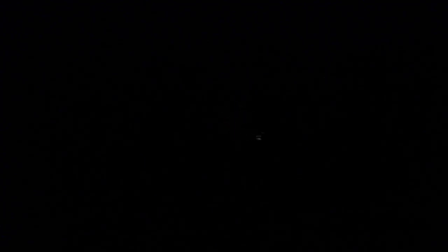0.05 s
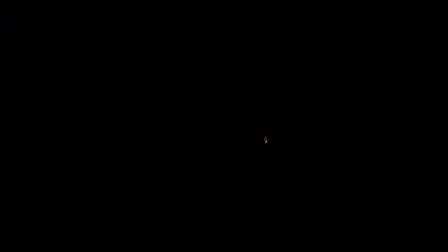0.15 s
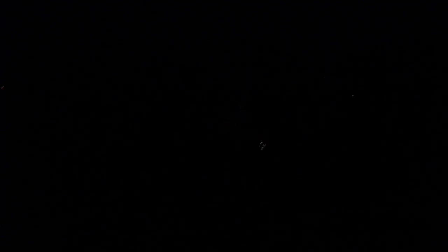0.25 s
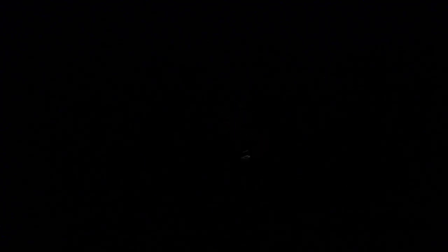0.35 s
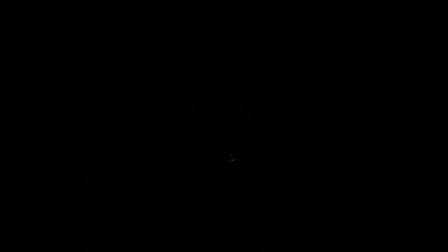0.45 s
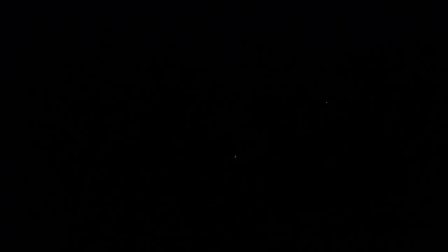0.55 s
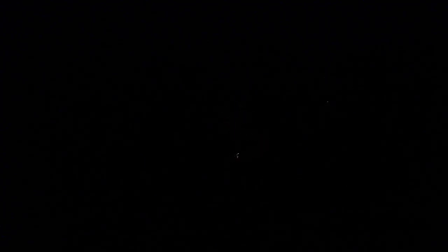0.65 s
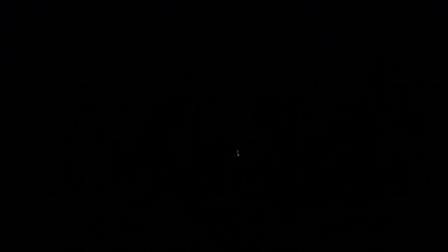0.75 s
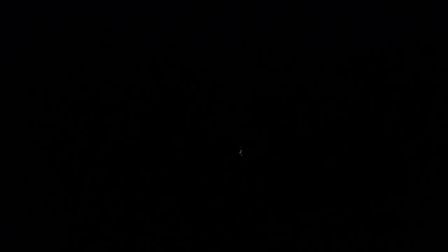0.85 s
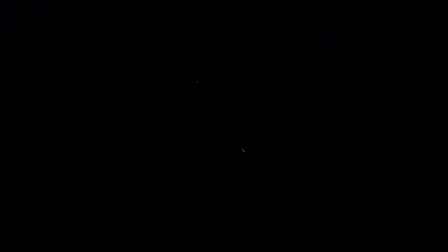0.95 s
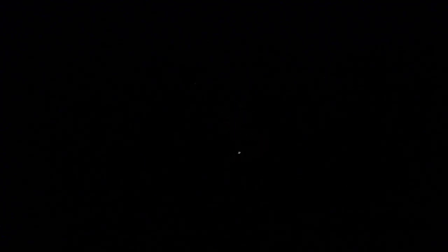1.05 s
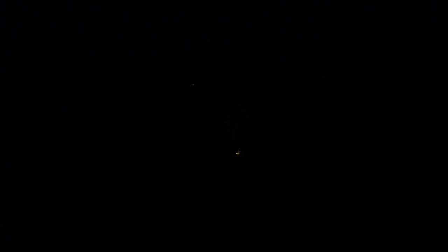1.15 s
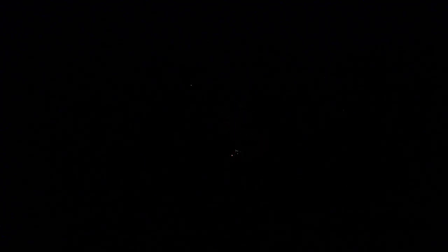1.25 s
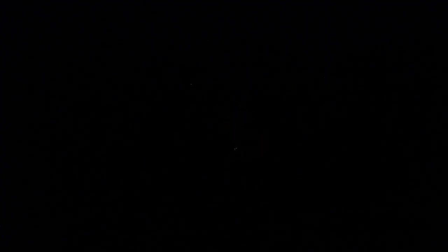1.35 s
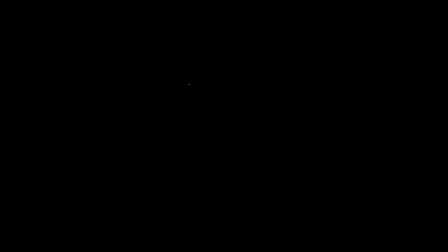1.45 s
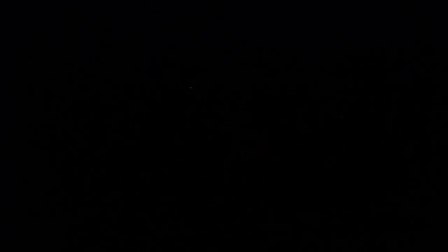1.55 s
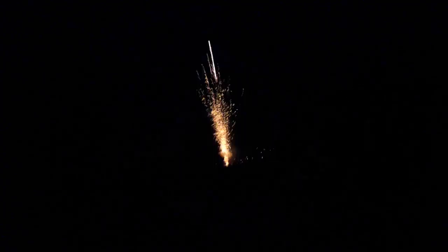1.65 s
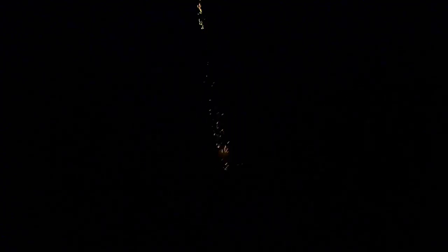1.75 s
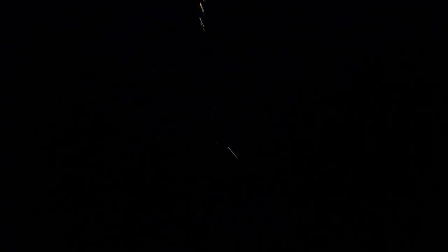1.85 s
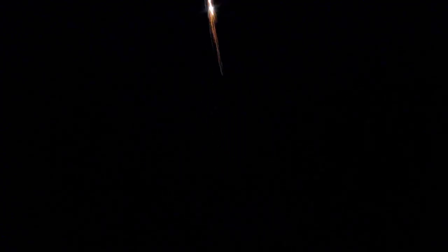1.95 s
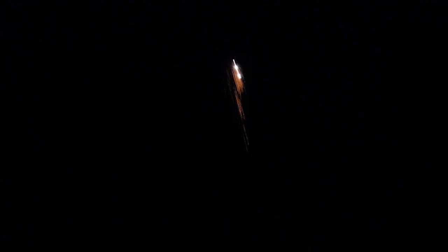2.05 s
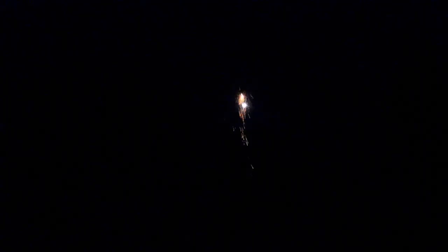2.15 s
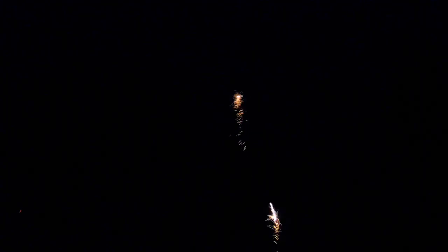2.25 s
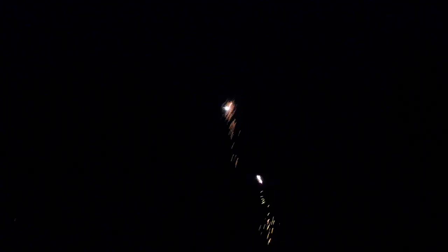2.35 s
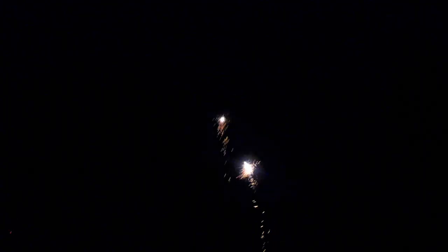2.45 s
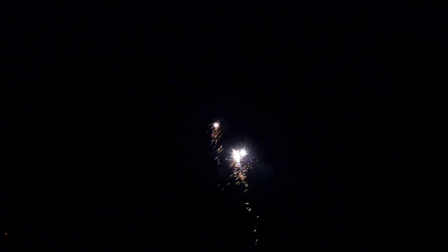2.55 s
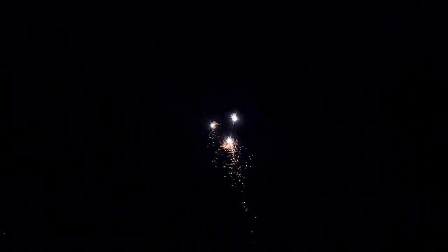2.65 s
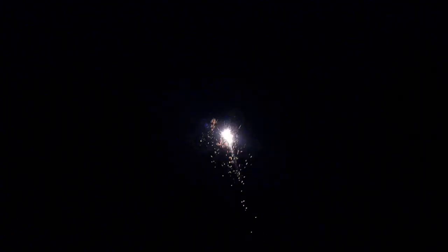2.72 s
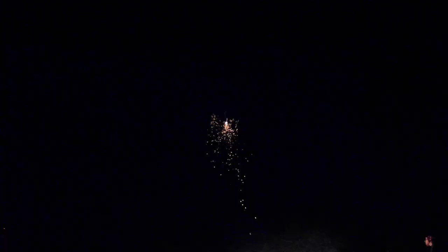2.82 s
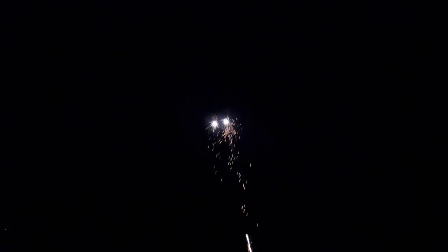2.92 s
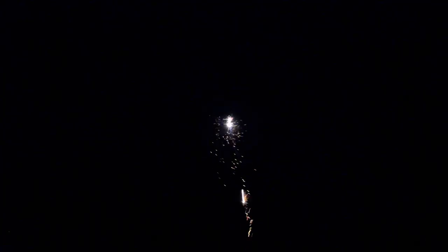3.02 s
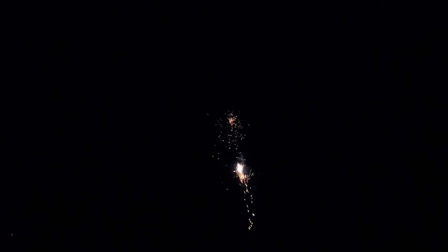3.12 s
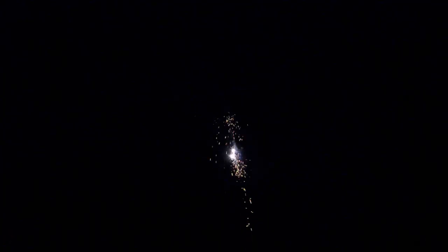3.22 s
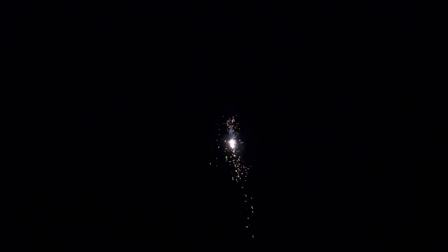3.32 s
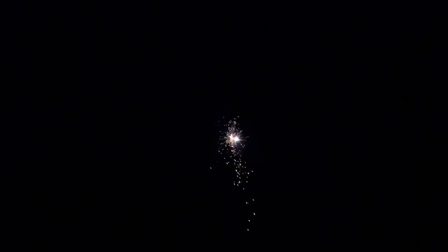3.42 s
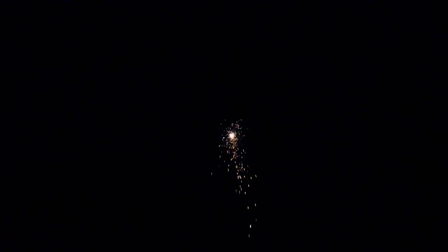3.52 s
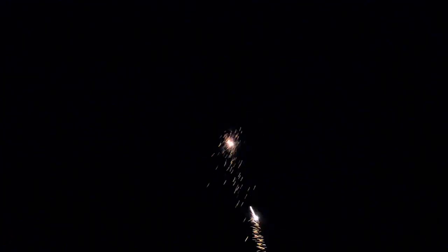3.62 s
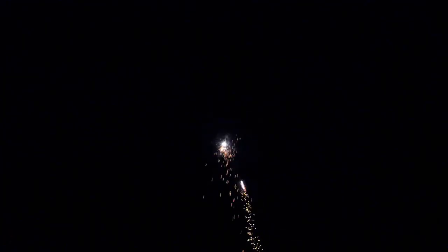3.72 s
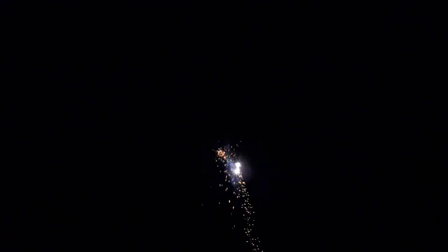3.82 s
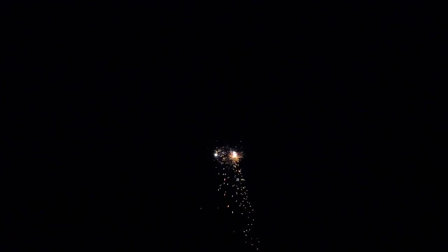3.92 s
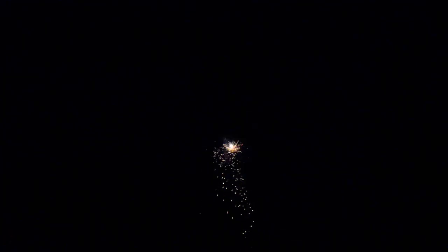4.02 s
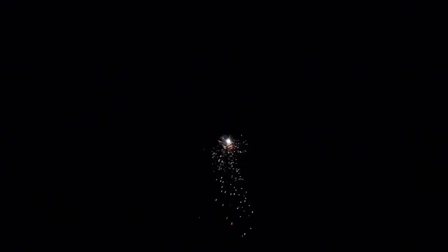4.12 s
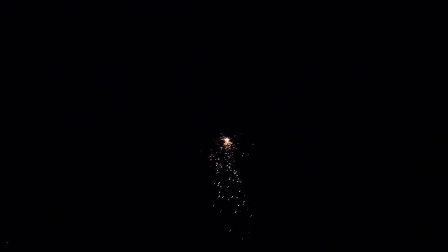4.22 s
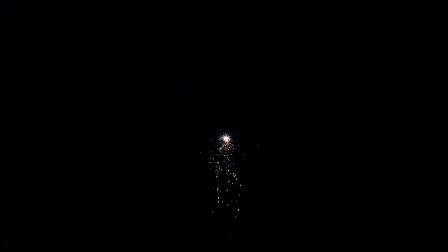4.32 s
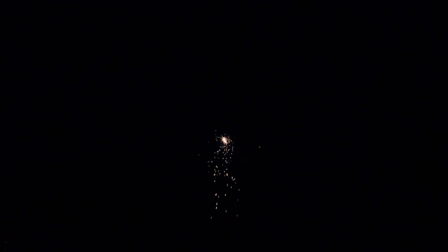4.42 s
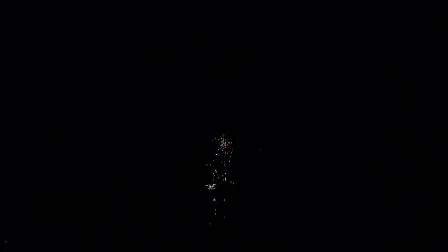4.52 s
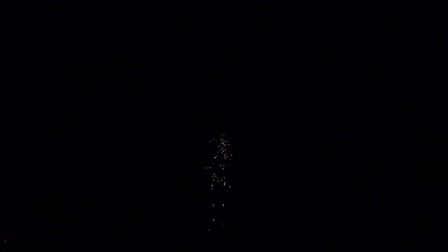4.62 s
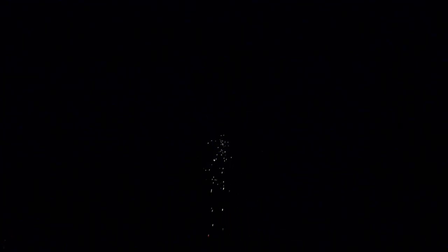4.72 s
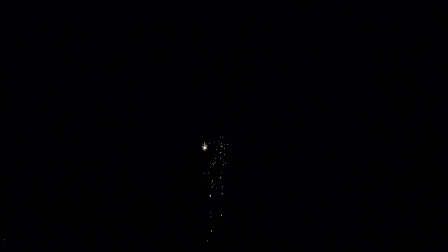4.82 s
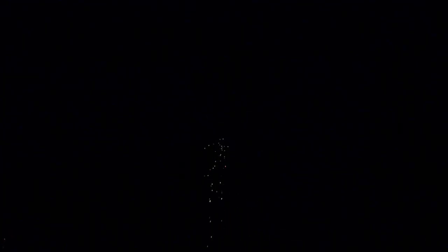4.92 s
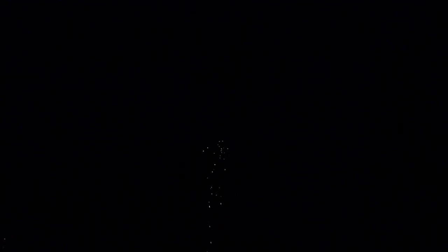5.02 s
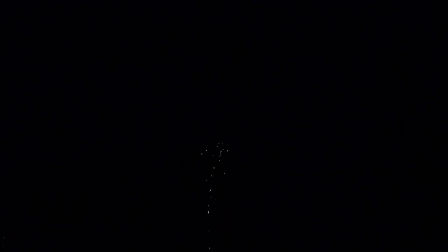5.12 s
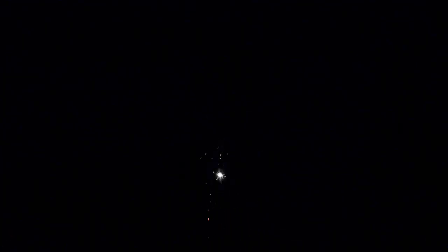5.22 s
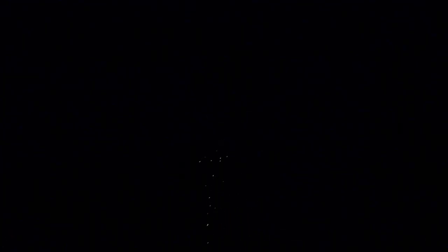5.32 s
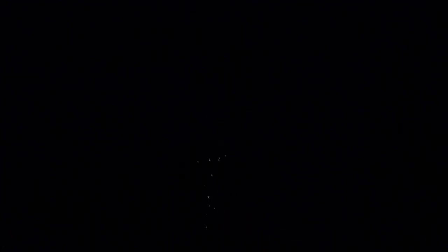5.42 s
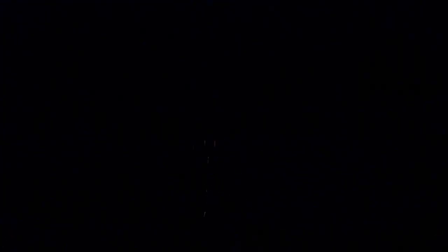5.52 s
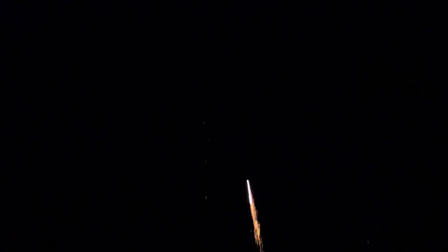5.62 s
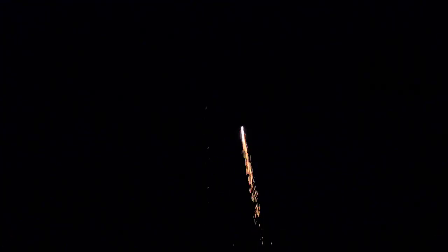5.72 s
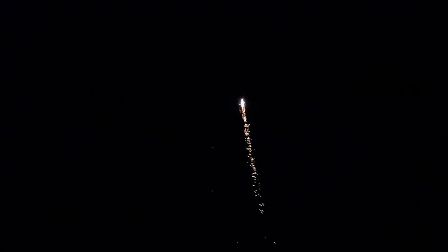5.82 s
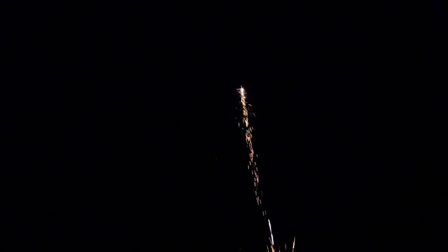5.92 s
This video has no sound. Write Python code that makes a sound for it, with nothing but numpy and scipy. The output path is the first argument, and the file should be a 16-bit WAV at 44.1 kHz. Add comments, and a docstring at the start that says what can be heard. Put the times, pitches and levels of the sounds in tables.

```python
"""Outdoors at night, close to small fireworks. Over soft air, wind and a drone come distant pops and fizz.
Six shots thump out of their tubes, each a crack, a push of gas and a short note. Each sends up a star,
a burning pellet whose grains burst in sharp cracks that bounce off the ground while tiny sparks sputter.
Shots and cracks echo from the surroundings, and the loud ones overload the microphone."""
import sys
import numpy as np
from scipy import signal
from scipy.fft import rfft, irfft, next_fast_len
from scipy.io import wavfile

SR = 44100
rng = np.random.default_rng(int(sys.argv[2]) if len(sys.argv) > 2 else 0)


def digitize_waveform(pressure):
    """Quantize a signal to 16-bit integers and store it at the path in sys.argv[1].

    Rows of a 2-D input are taken as channels; values are limited to [-1, 1].
    """
    field = np.atleast_2d(pressure).T
    bounded = np.clip(field, -1, 1)
    quanta = np.round(bounded * 32767).astype(np.int16)
    wavfile.write(sys.argv[1], SR, quanta)


N = 262836

# The colour (low and high balance) of night air. Each row: frequency in Hz, relative level in dB.
AIR_COLOUR = [(12, -34), (20, -11), (91, -9), (158, -13.5), (182, -17), (293, -16.5), (388, -18.5),
              (499, -17), (678, -20), (780, -19), (849, -21.5), (1440, -22.5), (3740, -35.5),
              (12400, -39.5), (16000, -41)]
# Wind moving over the microphone. Each row: time in seconds, level in dB.
WIND_LEVEL = [(0, -81), (1.5, -46.5), (1.8, -51), (1.9, -38), (2.02, -41), (2.2, -53), (3.4, -76),
              (4.5, -60), (5.96, -51)]
# A faint, far-off drone. Each row: time in seconds, level in dB.
DRONE_LEVEL = [(0, -58), (.3, -56), (.45, -51), (.85, -54), (1.1, -58.5), (1.45, -58), (5.96, -59)]
# Distant fireworks. Each row: start in seconds, level in dB before dulling.
DISTANT_POPS = [(.030, -33.5), (.060, -36.5), (0.217, -36), (1.054, -30)]
# The colour of one crack. Each row: frequency in Hz, relative level in dB.
PULSE_COLOUR = [(40, -18), (200, -11), (600, -4.5), (1200, 2.5), (1750, 3.5), (2750, -9.5), (3550, -5),
                (4400, -27), (5200, -17), (6700, -28.5), (7800, -37), (9400, -28.5), (11400, -35.5),
                (13300, -40)]
# Shots from the tubes. Each row: start in seconds, crack in dB, gas push in dB, push length in
# milliseconds, gas jet in dB, tube note in Hz, note in dB, seconds for the note to fade by 60 dB,
# feed to the echoes in dB.
TUBE_SHOTS = [(1.5360, 11.5, 11.5, 1.4, 5.5, 156.6, 12, 0.025, 1),
              (2.0406, 15.5, 5.5, 0.76, -6, 215, -19, 0.037, -4.5),
              (2.7567, 14, 10, 0.76, -8, 156, -10, 0.072, -8),
              (3.3956, -0.5, 9.5, 0.93, -4, 179.7, -12, 0.082, -8.5),
              (5.4018, 9, 2, 0.82, -10, 192, -18, 0.083, -5),
              (5.7966, 5, 2, 0.93, -7, 251, -8, 0.037, -4.5)]
# The colour of gas rushing out of a tube. Each row: frequency in Hz, relative level in dB.
GAS_JET_COLOUR = [(60, 4), (250, 7.5), (480, 1.5), (800, 4), (1700, 4.5), (2600, -1), (5000, -22),
                  (9000, -27), (15000, -27)]
# How the echoes of shots and of cracks die away. Each row: delay in seconds, relative level in dB.
SHOT_ECHO_SHAPE = [(0, 14), (.02, -14.5), (.04, -10.5), (.066, -6), (0.081, 0.5), (.1, -0.5), (.12, -5),
                   (.2, -12.5), (.32, -20), (0.998, -63)]
CRACK_ECHO_SHAPE = [(0, 12), (0.021, 0.5), (.045, 1), (0.069, 4.5), (.1, -0.5), (0.161, -8), (.3, -16.5),
                    (0.599, -12.5), (1.002, -57)]
# The colour of those echoes. Each row: frequency in Hz, boost or cut in dB.
SHOT_ECHO_TONE = [(30, -25), (85, -8), (130, -4), (180, 1.5), (300, -2.5), (600, 2.5), (1500, -1),
                  (2700, 15), (4500, -0.5), (9000, -8), (15000, -11)]
CRACK_ECHO_TONE = [(60, -50), (160, 2), (350, -3), (800, -1), (1600, -1), (3500, 0), (5200, 5), (9500, 3),
                   (15000, 3)]
# The cracks that stand out. Each row: start in seconds, peak in dB, base treble tilt in dB per octave.
MAIN_CRACKS = [(1.741, -11.5, 3), (1.7506, -8.5, 5.5), (1.8528, -16.5, 1.5), (1.882, -9.5, -2),
               (1.9104, 4.5, 8), (1.948, -3.5, 6.5), (1.9577, -6, 7), (2.026, -1.5, -8), (2.0608, 3, 1.5),
               (2.0659, 2.5, -5), (2.097, 0.5, 6.5), (2.1458, 4.5, 3), (2.1713, 3.5, 1), (2.1769, -1, 1),
               (2.1977, 0.5, 3), (2.3443, -1.5, 3.5), (2.3646, -5, 4), (2.3782, 6.5, 1), (2.4075, 4.5, 4),
               (2.4095, 4, 9), (2.4409, 7.5, 5), (2.4521, 8.5, 1.5), (2.4696, 9.5, 4.5), (2.4723, 11, 0),
               (2.507, 10, 5), (2.517, 10.5, 2.5), (2.5555, 6, 1), (2.563, 10.5, 2), (2.5881, -0.5, -3),
               (2.6011, 0.5, 3), (2.6099, 4, 6), (2.6247, 8, 2), (2.6596, 11.5, -4), (2.6666, 6.5, 10),
               (2.6826, -3, -9), (2.6899, 9.5, -1), (2.6937, 11.5, 4), (2.721, -3.5, 8), (2.8219, 2, 1),
               (2.8411, 4, 2), (2.851, 7.5, 4), (2.862, -0.5, 6), (2.883, 1.5, 2), (2.8984, -3.5, -1),
               (2.909, 6, 1), (2.934, 3.5, 2), (2.9485, -1, 2), (2.9946, 8, 2.5), (3.0252, 0, 2),
               (3.0368, 7.5, 4.5), (3.0817, .5, 1), (3.0998, -3, 13), (3.1079, -1, -1), (3.1127, 3, 4.5),
               (3.129, 0, 2), (3.1564, 5, 5), (3.1943, 5.5, 2.5), (3.2123, 2.5, 2), (3.2516, 1, 4.5),
               (3.2765, 0, -1), (3.2871, -0.5, 1), (3.2976, 3, 1), (3.324, 2.5, -7), (3.3478, 4, -0.5),
               (3.3684, 7, 5), (3.3877, 4, .5), (3.467, 9, 3), (3.5132, -4, -9), (3.5326, 6, 3),
               (3.5752, -.5, 7), (3.6093, 2, 4), (3.633, -1, 0), (3.6376, 3.5, 1.5), (3.6562, 0, 3),
               (3.6696, 5.5, 2), (3.7027, 7.5, 4.5), (3.7792, 2, 1.5), (3.7919, 7.5, 4.5), (3.8136, 2.5, 4),
               (3.8469, 2, -1), (3.868, 6.5, 8), (3.929, 3.5, -2.5), (3.9421, 2, -1), (3.9488, 4, 4),
               (3.9695, -3, 5.5), (3.9977, -4.5, -1), (4.0204, 8, 3), (4.1145, 1.5, -2), (4.12, -2.5, -1),
               (4.1507, 2.5, 2), (4.1824, 2.5, 1), (4.244, -5.5, -0.5), (4.2627, -6.5, 4), (4.285, 0, 4.5),
               (4.32, -1, 3.5), (4.3917, 1, 0.5), (4.4356, -5, 1.5), (4.4828, 12, -.5), (4.6635, 2.5, 1.5),
               (4.7967, 9.5, 1), (5.2098, -5, -1), (5.5182, -16.5, 3.5), (5.7245, -20.5, 0),
               (5.7615, -21, 2), (5.787, -20, 2), (5.8135, -1.5, 5), (5.8216, 1, 3), (5.8583, 2, 5.5),
               (5.9253, -7.5, -1.5)]
# The microphone's uneven response. Each row: frequency in Hz, boost or cut in dB.
MIC_COLOUR = [(600, 0.5), (900, -1), (1300, 0.45), (2000, 0), (4100, 0), (5100, -0.06), (6800, -0.5),
              (7700, -3), (8450, -2), (9000, 1.5), (9900, -1.3), (11500, -2.9), (12400, 1), (13050, -1.5),
              (13700, 1.5), (16000, -6)]

# A star's life, in seconds after its shot: it catches, then burns fiercely for a while.
FUSE_S, FIERCE_START_S, FIERCE_END_S = .31, .41, .98


def gain_of(db):
    """Turns decibels into a number to multiply a sound by."""
    return 10 ** (np.asarray(db) / 20)


def evened(x):
    """Scales a sound to an average (rms) level of one."""
    return x / np.sqrt(np.mean(x ** 2) + 1e-20)


def colour_db(colour, hz):
    """Looks up a colour table, sliding between its rows on a scale of pitch."""
    row_hz, row_db = np.transpose(colour)
    return np.interp(np.log(hz + 1), np.log(row_hz + 1), row_db)


def level(curve):
    """Turns a table of times and decibels into a gain for every sample."""
    return gain_of(np.interp(np.arange(N) / SR, *np.transpose(curve)))


def add(mix, start_s, sound):
    """Mixes a sound in at its start time."""
    part = mix[max(round(start_s * SR), 0):][:len(sound)]
    part += sound[:len(part)]


def coloured(x, colour):
    """Boosts or cuts each frequency as a colour table says."""
    size = next_fast_len(len(x) + 4096)
    gains = gain_of(colour_db(colour, np.fft.rfftfreq(size, 1 / SR)))
    return irfft(rfft(x, size) * gains, size)[:len(x)]


def band(x, hz, kind, order=2):
    """Keeps the "low" or the "high" side of a frequency."""
    return signal.sosfilt(signal.butter(order, hz, kind, fs=SR, output="sos"), x)


def through(x, response):
    """Lets every sample set off a copy of the response, up to the end of the scene."""
    return signal.oaconvolve(x, response)[:N]


def crack_pulse(tilt_db=0., size=1024):
    """One sharp pulse of pressure with a peak of one; more tilt makes it brighter."""
    hz = abs(np.fft.fftfreq(size, 1 / SR))
    log_gain = np.log(gain_of(colour_db(PULSE_COLOUR, hz) + tilt_db * np.log2(1 + hz / 2500)))
    spectrum = np.exp(np.conj(signal.hilbert(log_gain)))  # packs the energy at the very start
    pulse = np.fft.ifft(spectrum).real[:size // 2]
    return -pulse / abs(pulse).max()


def scattered(x, fade_s, size=4096):
    """Nearby things throw a sound back as a short spray that drops 60 dB in fade_s."""
    t = np.arange(size) / SR
    spray = rng.standard_normal(size) * gain_of(-60 * t / fade_s) * (1 - np.exp(-t / .00063))
    return signal.fftconvolve(x, spray / np.linalg.norm(spray))


def night(air_db=-50):
    """Steady night air, a low, lumpy wind and a far-off drone, all shaped from noise."""
    air, wind, drone = rng.standard_normal((3, N))
    air = gain_of(air_db) * evened(coloured(air, AIR_COLOUR))
    wind = level(WIND_LEVEL) * evened(band(band(wind, 55, "low"), 14, "high"))
    drone = level(DRONE_LEVEL) * evened(band(band(drone, 160, "low", order=4), 85, "high", order=4))
    return air + wind + drone


def far_pops(smear_db=2, dull_hz=2200):
    """Distant fireworks arrive dull and smeared."""
    out = np.zeros(N)
    pulse = band(crack_pulse(), dull_hz, "low")
    for start, db in DISTANT_POPS:
        add(out, start, gain_of(db) * pulse)
        add(out, start, gain_of(db + smear_db) * scattered(pulse, fade_s=.043))
    return out


def far_fizz(peak_s=.86, width_s=.16, db=-57.5, dull_hz=2000):
    """The crackle of a distant firework blurs into one soft swell."""
    swell = np.exp(-((np.arange(N) / SR - peak_s) / width_s) ** 2)
    fizz = through(rng.standard_normal(N), crack_pulse())
    return gain_of(db) * swell * evened(band(fizz, dull_hz, "low"))


def shots(overtone_db=-13, jet_fade_s=.025, roar_db=-14, roar_fade_s=.15, near_db=-17,
          boom_db=-2, front_db=10):
    """Gas bursts out of each tube and makes it ring. Returns the sound and what feeds its echoes."""
    out, echo_feed = np.zeros((2, N))
    t = np.arange(SR // 4) / SR
    for start, crack_db, push_db, push_ms, jet_db, hz, note_db, note_fade_s, feed_db in TUBE_SHOTS:
        progress = t / (push_ms / 1000)
        push = -gain_of(push_db) * (1 - progress) * np.exp(-progress)
        pulse = np.pad(crack_pulse(), (0, len(t)))[:len(t)]
        crack = gain_of(crack_db) * band(pulse, 2100, "low", order=3)
        jet = gain_of(jet_db) * evened(coloured(rng.standard_normal(len(t)), GAS_JET_COLOUR))
        # a tube closed at one end rings at 1, 3 and 5 times its lowest frequency
        ring = sum(gain_of(k * overtone_db) * np.sin(2 * np.pi * (2 * k + 1) * hz * t) for k in range(3))
        note = -gain_of(note_db - 60 * t / note_fade_s) * ring
        hiss = gain_of(-60 * t / jet_fade_s) * jet
        roar = gain_of(roar_db - 60 * t / roar_fade_s) * band(jet, 650, "low")  # big swirls last longer
        nearby = gain_of(near_db) * scattered(push + crack, fade_s=.086)[:len(t)]
        shot = band(push, 1500, "low") + crack + note + hiss + roar + nearby
        add(out, start, band(shot, 60, "high", order=1))  # a small opening gives little deep bass
        blast = push + crack + gain_of(boom_db) * note  # these parts carry far
        blast[0] += gain_of(jet_db + front_db)  # a fierce jet sends a brighter shock front
        add(echo_feed, start, gain_of(feed_db) * blast)
    return out, echo_feed


def echoes(x, shape, colour, per_s=8000, patchy_db=3.5, air_loss_db=1.5, paths=3):
    """The surroundings answer; air dulls the late echoes, and the paths change as the stars move."""
    t, out = np.arange(SR) / SR, np.zeros(N)
    for k in range(paths):
        bounces = rng.standard_normal(SR) * (rng.random(SR) < per_s / SR)
        wobble = evened(band(rng.standard_normal(SR), 57, "low"))
        bounces *= gain_of(np.interp(t, *np.transpose(shape)) + patchy_db * wobble)
        hz, delay, spectra = signal.stft(bounces / np.linalg.norm(bounces), SR, nperseg=256)
        loss_db = air_loss_db * np.outer(hz / 1000, delay)  # grows with each kHz and each second
        tail = signal.istft(spectra * gain_of(-loss_db), SR, nperseg=256)[1]
        # the paths take turns fading in and out
        share = np.sqrt(2 / paths) * np.cos(np.pi * (3 * np.arange(N) / SR + k / paths))
        out += through(x * share, tail)
    return coloured(out, colour)


def star_age(now):
    """Seconds since the shot of the newest star to have caught, or FUSE_S if none has yet."""
    return min((now - shot[0] for shot in TUBE_SHOTS if now - shot[0] > FUSE_S), default=FUSE_S)


def cracks(steepen=.02, climb_s=.2168, top_lag_s=.0068, near_db=-16, ground_db=-8.5, grass_db=-16,
           wall_s=.0333, wall_db=-28):
    """Each grain bursts once; nearby things, the grassy ground and a wall throw the pulse back."""
    out = np.zeros(N)
    for start, db, tilt_db in MAIN_CRACKS + chained_cracks():
        pulse = gain_of(db) * crack_pulse(tilt_db + steepen * db)  # stronger bursts are sharper
        near_spray = crack_pulse(tilt_db / 2 + 6)
        grass_spray = crack_pulse(tilt_db / 2 + 4)
        # a star slows as it climbs; the higher it is, the later the ground bounce
        height = 1 - np.exp(-star_age(start) / climb_s)
        lag = top_lag_s * height * (1 + .03 * rng.standard_normal())
        add(out, start, pulse)
        add(out, start, gain_of(db + near_db) * scattered(near_spray, fade_s=.0092))
        add(out, start + lag, gain_of(ground_db) * band(pulse, 3400, "low", order=1))
        add(out, start + lag, gain_of(db + grass_db) * scattered(grass_spray, fade_s=.021))
        add(out, start + wall_s, gain_of(wall_db) * pulse)
    return out


def chained_cracks(share=.6, soonest_s=.002, wait_s=.007, weaker_db=-11, spread_db=2.5, tilt_db=3.5):
    """While a star burns fiercely, a grain may set off a weaker neighbour. Returns extra crack rows."""
    chance, wait = rng.random((len(MAIN_CRACKS), 2)).T
    size, brightness = rng.standard_normal((len(MAIN_CRACKS), 2)).T
    rows = []
    for k, (start, db, _) in enumerate(MAIN_CRACKS):
        if chance[k] < share and FIERCE_START_S < star_age(start) < FIERCE_END_S:
            later = start + soonest_s - wait_s * np.log(1 - wait[k])
            rows.append((later, db + weaker_db + spread_db * size[k], tilt_db * brightness[k]))
    return rows


def sputter(db=-39, per_s=900, spread_db=4, start_s=.43, rise_s=.12, end_s=1.73, fade_s=.44,
            flare_db=4.5, flare_s=.18):
    """Countless tiny sparks, a few of them larger; each star's share flares up, holds and fades."""
    sizes = gain_of(spread_db * np.minimum(rng.exponential(1, N), 5))
    fires = rng.random(N) < per_s / SR
    sparks = evened(through(sizes * fires, crack_pulse(tilt_db=3)))
    ages = np.arange(N) / SR - np.array(TUBE_SHOTS)[:, :1]  # seconds since each shot
    burning = np.clip(np.minimum((ages - start_s) / rise_s, (end_s - ages) / fade_s), 0, 1)
    flare = gain_of(flare_db * np.exp(-((ages - start_s - rise_s) / flare_s) ** 2))
    return gain_of(db) * np.linalg.norm(burning * flare, axis=0) * sparks


def scene(crack_echo_db=-12, shot_echo_db=-13):
    """All the sounds and their echoes meet at one microphone."""
    crackle = cracks()
    thumps, echo_feed = shots()
    wash = gain_of(crack_echo_db) * echoes(crackle, CRACK_ECHO_SHAPE, CRACK_ECHO_TONE)
    wash += gain_of(shot_echo_db) * echoes(echo_feed, SHOT_ECHO_SHAPE, SHOT_ECHO_TONE)
    return (crackle + thumps + wash + sputter() + far_pops() + far_fizz() + night())[None]


def record(dry, limit=.7, top_hz=16100):
    """The microphone flattens loud peaks, colours the sound and loses the highest treble."""
    clipped = np.clip(dry[0], -limit, limit)
    drooped = band(clipped, 13, "high", order=1)  # cutting the deepest bass makes the flat tops sag
    treble_cut = signal.firwin(255, top_hz, window=("kaiser", 9), fs=SR)
    return signal.oaconvolve(coloured(drooped, MIC_COLOUR), treble_cut, "same")[None]


dry = scene()
out = record(dry)
digitize_waveform(out)
```